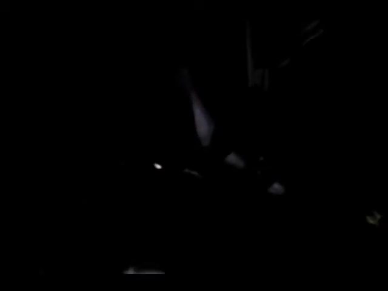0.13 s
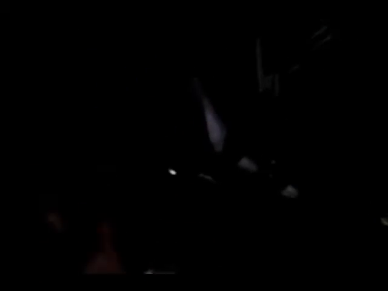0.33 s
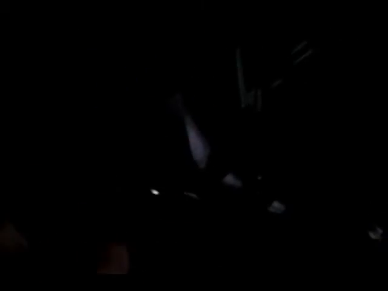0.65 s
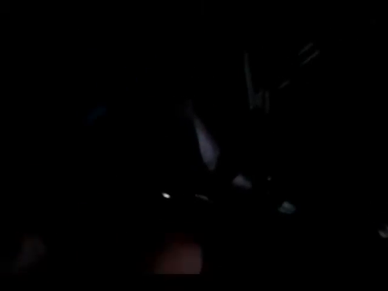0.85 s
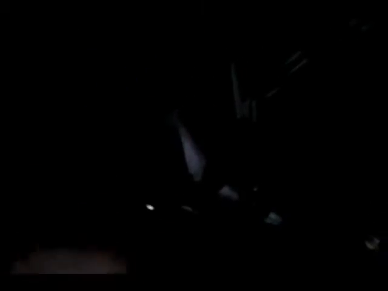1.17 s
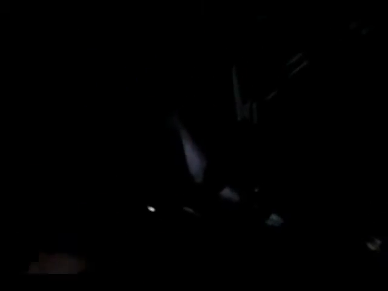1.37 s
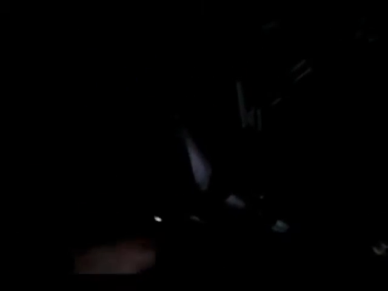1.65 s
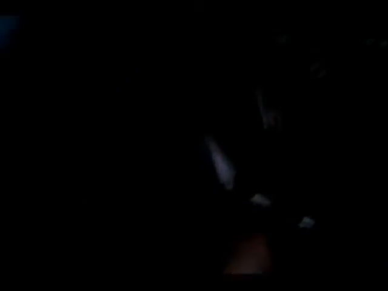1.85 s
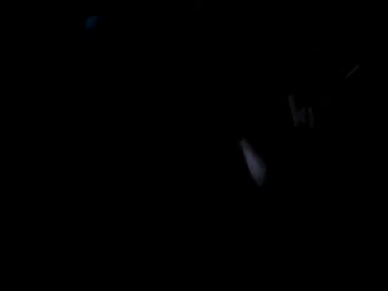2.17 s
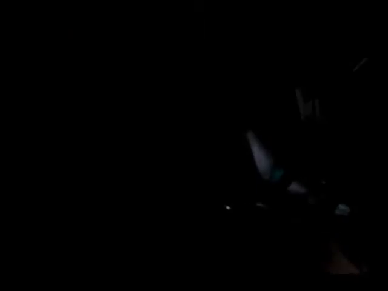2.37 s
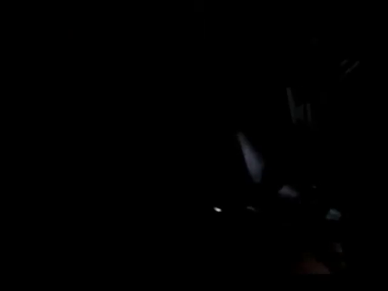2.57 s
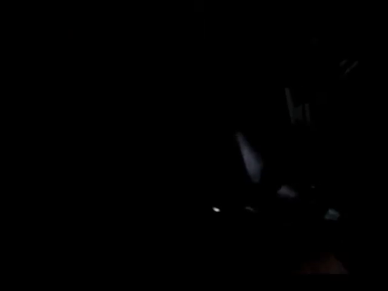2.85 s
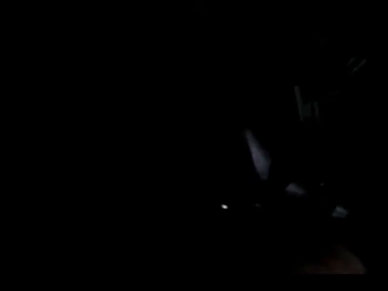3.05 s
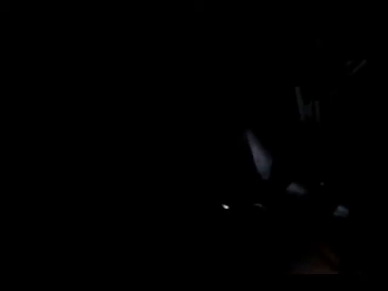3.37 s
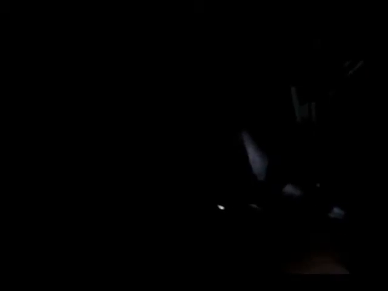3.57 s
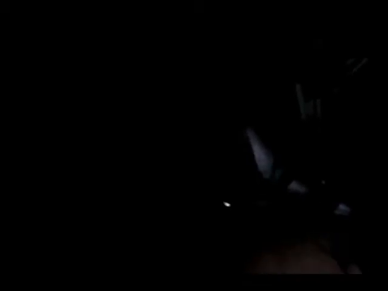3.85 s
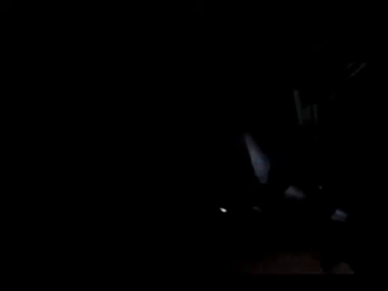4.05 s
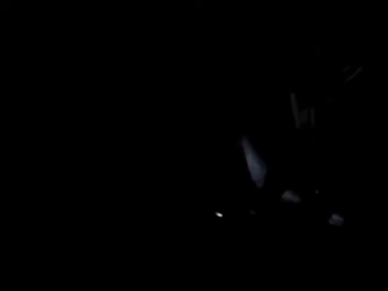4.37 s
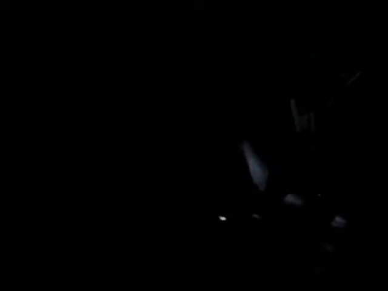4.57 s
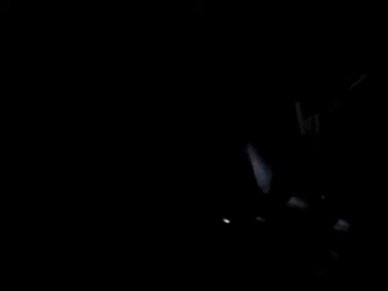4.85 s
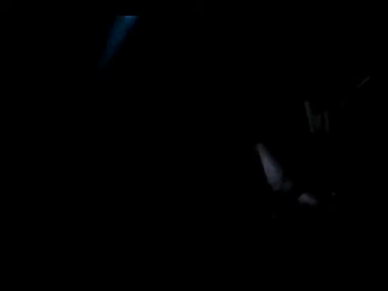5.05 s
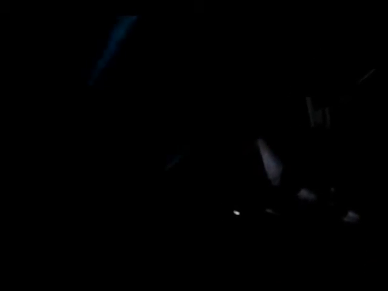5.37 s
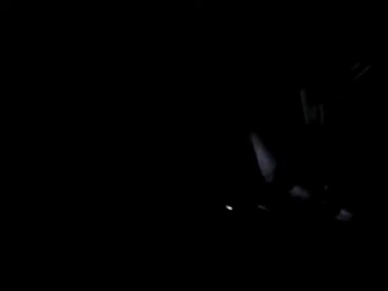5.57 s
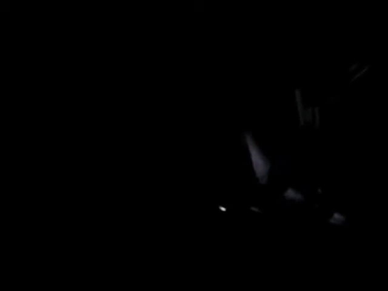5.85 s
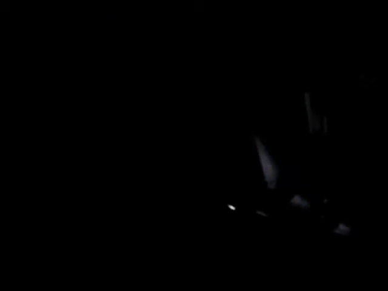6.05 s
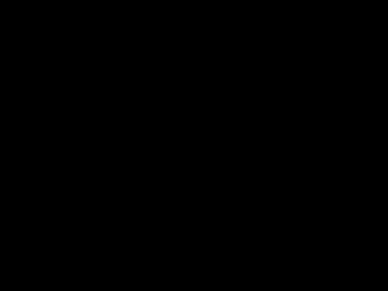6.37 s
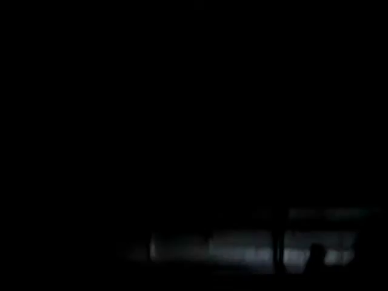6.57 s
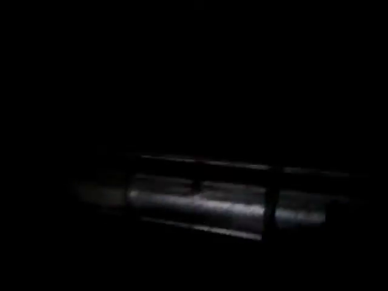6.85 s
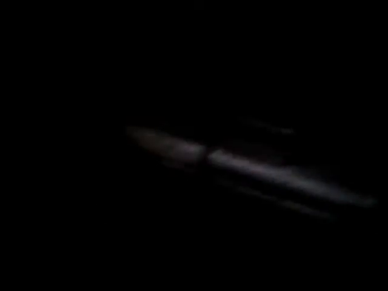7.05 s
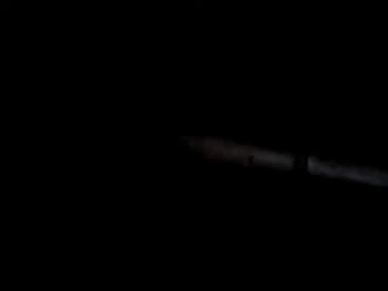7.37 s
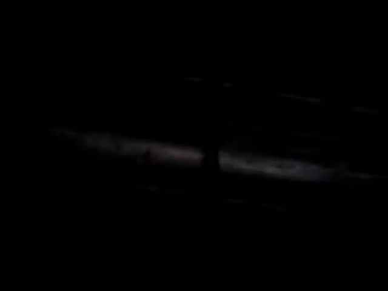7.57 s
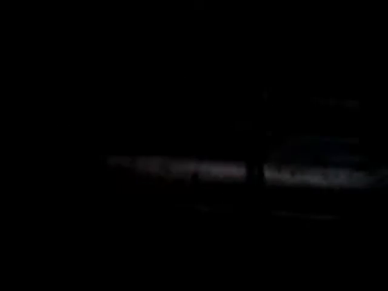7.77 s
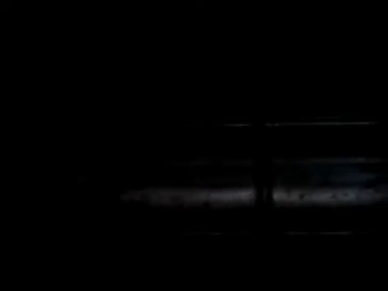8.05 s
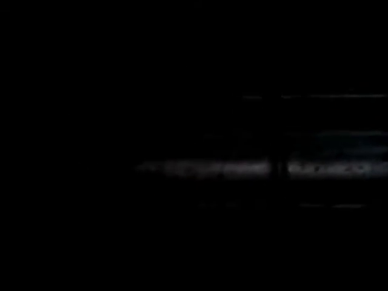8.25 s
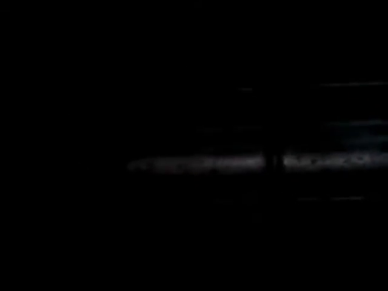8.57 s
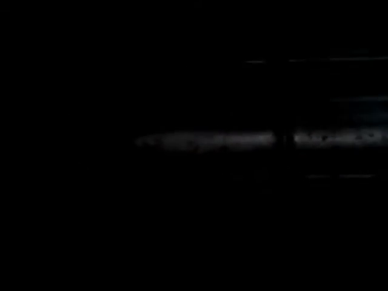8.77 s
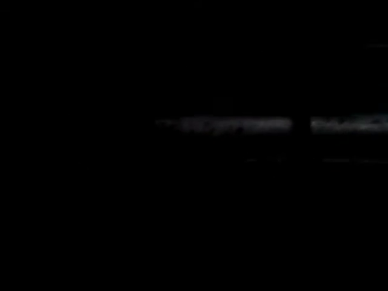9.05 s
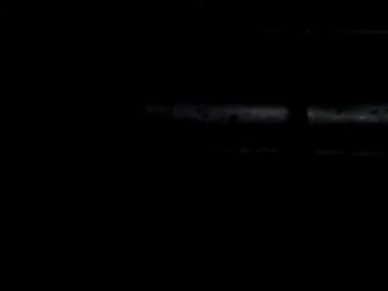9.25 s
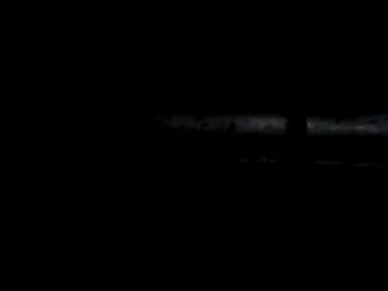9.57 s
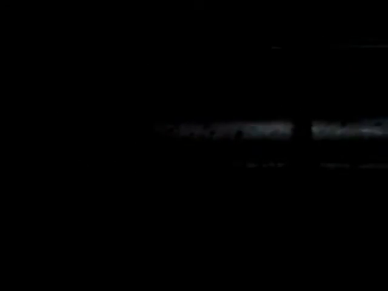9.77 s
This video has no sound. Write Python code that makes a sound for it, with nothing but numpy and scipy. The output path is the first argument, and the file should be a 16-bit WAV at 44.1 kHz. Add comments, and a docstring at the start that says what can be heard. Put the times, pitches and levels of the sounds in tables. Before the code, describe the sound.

Very close, a thin stamped metal shield is wiggled by hand beneath a vehicle. From 0 to 2 s, short bright clanks and clicks come unevenly, with a very hard blow and a dull microphone thud just after 1 s. Between 2 and 3.6 s there are lighter ticks, soft fingertip knocks and sleeve rustle. Clanks thicken at 3.7 s, and at 4.2 s a loud clattering burst snaps, scrapes and squeaks, followed by another scraping snap at 4.65 s. After that the sheet hangs slacker; only faint clicks, brisk rubs and a weak rasp near 6.3 s, with a thud at 6.55 s. A car passes some way off, tyres roaring loudest around 5.7 s, then hissing away over low traffic drone. Soft taps at 8.55 s precede duller clanks and buckling pops at 9.0 to 9.35 s, ending in light rustle and taps. Small narrow-band microphone, short hollow tail.

```python
"""Loose metal shield under a vehicle

A thin stamped shield is wiggled by hand: noise chatter rings its modes in clanks, scrapes and a light rattle.
Gliding tones add snaps and squeaks, and fingertips knock dully on the sheet.
Sleeves and grip rustle as grainy noise; a car passes some way off over a low traffic drone.
Jolts thud on a small microphone close by, which rounds off peaks and keeps a narrow band."""
import sys
import numpy as np
from scipy import signal
from scipy.fft import rfft, irfft, next_fast_len
from scipy.io import wavfile
from scipy.ndimage import uniform_filter1d, map_coordinates

SR = 44100
rng = np.random.default_rng(int(sys.argv[2]) if len(sys.argv) > 2 else 0)


def generate_wav(signal):
    """Clip the signal to [-1, 1] and save it as 16-bit WAV at the path in sys.argv[1]."""
    frames = np.transpose(np.atleast_2d(signal))
    scaled = np.clip(frames, -1, 1) * 32767
    pcm = np.round(scaled).astype(np.int16)
    wavfile.write(sys.argv[1], SR, pcm)


N = 437472

# contacts of the shield, before the mix levels in clanks(); body and edge are relative to the contact:
# start_s, level_db, body_db, edge_db, ring_hz
CONTACTS = [(0.013, -6.5, -19, -0.5, 2170), (.558, -5, -29, -3, 2147), (.573, -9, -22, -3, 1190),
            (.743, -2.5, -25, -3, 2133), (0.865, -19, -11, -5.5, 1870), (.917, -18.5, -12, -5.5, 1323),
            (0.974, -31.5, -22, -1.5, 1290), (1.055, -13, -29, -1, 1260), (1.065, 7, -35, 0.5, 1174),
            (1.089, -5, -20, -2.5, 1300), (1.116, -7.5, -25, -2, 1200), (1.204, -22, -16, -4.5, 1160),
            (1.246, -9, -7, -11, 1750), (1.251, -11.5, -15, -10, 1278), (1.468, -27, -11, -2.5, 1300),
            (1.563, -17, -25, -7.5, 1353), (1.58, -5, -16.5, -2.5, 1465), (1.916, -4.5, -19, -2.5, 1710),
            (2.342, -25, -6.5, -5.5, 1750), (2.394, -17.5, -13, -4, 1720), (2.435, -21, -16, -5.5, 1310),
            (2.549, -27, -30, -6, 1410), (2.676, -25, -11, -2, 1300), (2.751, -23.5, -32, 0, 1270),
            (3.049, -17.5, -5.5, -15.5, 1100), (3.177, -10, -27, -4, 1374), (3.193, -15, -12.5, -13, 1390),
            (3.27, -24, -2, -17, 1220), (3.338, -20.5, -27, -0.5, 1410), (3.371, -21.5, -18, -3, 1740),
            (3.399, -25, -35, -4, 2100), (3.446, -30.5, -17, -4, 1110), (3.683, -1.5, -20, -2, 1190),
            (3.705, -4.5, -12, 0, 1320), (3.741, -12.5, -8.5, -5.5, 1020), (3.768, -11.5, -21, -4, 2200),
            (3.948, -24, -24, -13, 1460), (3.973, -21, -16, 2.5, 1160), (4.007, -13, -24, -1.5, 1210),
            (4.033, -10, -24, 1, 1100), (4.163, 5.5, -20, -2, 1037), (4.187, -3, -22, -12, 1110),
            (4.198, 4, -34, -7, 1184), (4.212, -3, -20, -7.5, 2240), (4.226, -9, -24, -17, 1274),
            (4.483, -23.5, -25, 0.5, 1480), (4.646, -1, -14, 5, 1220), (4.669, -12, -28, 0, 1400),
            (4.678, -4.5, -16, -18, 1210), (5.395, -20.5, -24, -5, 1010), (5.716, -17, -20, -11, 975),
            (7.139, -31.5, -23, -2, 904), (8.124, -26.5, -11, -10.5, 1180), (9.038, 0, -22, -6.5, 1742),
            (9.043, -3, -9, -24, 1093), (9.204, -24, -3.5, -12, 1007), (9.245, -25, -11, -3, 1710),
            (9.331, -2, -4.5, -15, 1023)]
# the sheet drags over its mount; the edge is relative to the middle clang:
# start_s, length_s, level_db, edge_start_db, edge_end_db
DRAGS = [(0.546, 0.033, -28, -4, 4), (1.278, 0.037, -45, -26, -28), (1.57, .022, -31, 2, -24),
         (1.905, 0.02, -40, -5, -9), (3.034, 0.022, -50, 3, -10), (3.67, 0.063, -22.5, 1.5, -14),
         (4.165, 0.088, -19, -0.5, -11), (4.456, 0.06, -39.5, -5, -2), (4.635, 0.07, -14, 6.5, -8.5),
         (6.278, 0.055, -34.5, 7, 5), (8.532, 0.11, -45, -30, -24), (9.13, 0.041, -45.5, -17, -23),
         (9.772, 0.067, -48, -13, -1)]
# the sheet snaps through to a new bend; the deeper modes are relative to the snap:
# start_s, pitch_hz, level_db, deep_db
SNAPS = [(4.176, 977, -12, -27.5), (4.19, 943, -10, -14), (4.232, 1308, -13, -26), (4.66, 980, -12, -12),
         (9.039, 1009, -18, 1), (9.293, 1006, -24, -11), (9.332, 1025, -17, -3)]
# deeper modes of a snap, added to deep_db: pitch_ratio, level_db
SNAP_DEEP_MODES = [(.26, -3), (.54, -1)]
# an edge catches and squeaks or rasps: start_s, length_s, start_hz, end_hz, width_hz, level_db
EDGE_SQUEAKS = [(3.447, 0.011, 6000, 5900, 300, -32), (4.184, .045, 2720, 2048, 354, -15.5),
                (4.32, 0.27, 5800, 5500, 160, -50.5), (4.643, 0.0365, 4100, 3404, 600, -12.5),
                (5.707, 0.0317, 3750, 3280, 1290, -26.5), (6.267, 0.094, 3130, 2585, 1500, -34.5)]
# fingertips knock softly on the sheet: start_s, peak_db
FINGER_TAPS = [(2.09, -36), (2.23, -47), (3.885, -35), (4.057, -30), (8.55, -24), (8.599, -29),
               (9.111, -32), (9.173, -28), (9.83, -26), (9.867, -36)]
# the taut sheet's strong modes, before scatter and hand damping: pitch_hz, width_hz, level_db
STRONG_MODES = [(288, 110, -16), (623, 26, -3), (1006, 40, 1), (1216, 38, 6), (1776, 130, 0.5),
                (2153, 38, -3.5), (3380, 72, -6.5), (4120, 150, -32), (4266, 90, -2.5), (5240, 200, -9),
                (5990, 380, -8.5), (6100, 160, -18), (6900, 40, -18), (7300, 250, -5.5), (7850, 100, -2)]
# the taut sheet's crowd of weaker modes, as a spectrum: pitch_hz, level_db
WEAK_MODES = [(60, -38.5), (180, -23.5), (300, -10), (480, -13), (800, -12), (1050, -10), (1350, 6),
              (1600, -6.5), (2100, -0.5), (2750, -13), (3800, -3.5), (4900, -13), (6500, -7), (8200, -12.5)]
# the sheet goes slack once it is bent loose, and all its modes sink: time_s, pitch_ratio
SLACKENING = [(4.7, 0.99), (8.0, 0.891)]

# strokes of sleeve and grip: start_s, length_s, level_db
HAND_STROKES = [(0, 0.68, -50.5), (0.21, 0.091, -39.5), (0.414, 0.057, -35.5), (0.484, 0.83, -50),
                (1.103, 0.43, -44.5), (1.781, 0.25, -42), (2.026, 0.55, -44), (2.46, 0.6, -48.5),
                (3.006, 0.49, -54), (3.283, 0.48, -48), (3.515, 1, -43), (4.204, 0.45, -50),
                (4.97, 0.35, -34), (5.02, 0.042, -37), (6.15, 0.29, -35.5), (6.276, .095, -30.5),
                (6.541, 0.047, -32.5), (6.573, 0.046, -28), (7.139, 0.005, -41), (8.23, 0.23, -50.5),
                (8.523, 0.2, -48.5), (8.892, 0.052, -37.5), (8.963, 0.043, -41.5), (9.053, .34, -48),
                (9.5, 0.05, -53), (9.616, 0.084, -47.5), (9.718, .18, -49)]
# colour of the soft rub, as relative noise density: pitch_hz, level_db (per Hz)
CLOTH_COLOUR = [(300, -18), (600, 1.5), (800, -1), (1300, -25), (1900, -4), (2700, -5.5), (3600, -4),
                (4800, -6.5), (7600, -3.5), (8500, -7.5)]
# colour of the brisk brush: pitch_hz, level_db (per Hz)
SLEEVE_COLOUR = [(400, -16), (1500, -1.5), (2400, 1.5), (4500, -3.5), (7800, -2.0)]
# jolts on the microphone's case: start_s, level_db
CASE_BUMPS = [(1.068, -25.5), (4.166, -23), (6.56, -28), (9.04, -34)]
# colour of those thuds: pitch_hz, level_db (per Hz)
THUD_COLOUR = [(20, -6), (70, 3.0), (200, -25), (600, -51), (2000, -100)]

# colours of the car's engine, tyre roar, road noise, hiss and song: pitch_hz, level_db (per Hz)
ENGINE_COLOUR = [(30, -16), (70, -5.5), (125, -6.5), (170, -8), (260, 1), (330, -3.5), (450, -16.5),
                 (800, -45.5)]
ROAR_COLOUR = [(210, -34.5), (350, -5.5), (630, -5), (850, -3), (1100, 0.5), (1500, -7), (1930, -10.5),
               (2730, -19), (3170, -17), (5050, -22), (7640, -25), (8500, -27), (11000, -58.5),
               (18700, -120)]
ROAD_COLOUR = [(210, -30), (350, -3), (509, -8.5), (647, -8.5), (879, -1.5), (1350, -3), (1690, -0.5),
               (2420, -18.5), (3870, -20.5), (7640, -38), (8500, -34), (11000, -73), (18700, -120)]
HISS_COLOUR = [(1500, -24.5), (2700, 1.5), (4800, -2.5), (7600, -9.5), (8500, -10)]
SONG_COLOUR = [(1000, -37), (1450, -6), (1680, 5), (1900, -8), (2400, -31), (3000, -25), (3800, -17.5),
               (4800, -39)]
# colour of the town's low traffic drone: pitch_hz, level_db (per Hz)
DRONE_COLOUR = [(18, -34.5), (30, 7), (33, -4.5), (64, 2), (103, 0.5), (238, -12), (390, -18), (500, -26.5),
                (650, -55.5), (1100, -120)]
# course of the drone, before its lift in traffic(): time_s, level_db
DRONE_COURSE = [(0.15, -50.5), (1.12, -52), (2.16, -46.5), (4.42, -44.5), (5.12, -39.5), (6.44, -42.5),
                (8.53, -46.5), (9.8, -45.5)]
# decay of the gap under the vehicle: pitch_hz, t60_s
GAP_DECAY = [(200, 0.7), (1200, 0.2), (4000, 0.2), (8000, 0.16)]
# hollow resonances between floor pan and ground, before the loss in hollow(): pitch_hz, width_hz, gain_db
GAP_RESONANCES = [(284, 110, 3), (623, 33, 1.5), (830, 19, 1.5), (1065, 37, 7), (1230, 44, 2.5),
                  (1620, 150, -2), (2230, 570, 4.5), (3440, 180, 2), (3940, 1100, 3), (5730, 1000, 6),
                  (7500, 780, 6.5)]

# a contact chatters this long at 0 dB on a taut sheet (t60 in s);
# hard blows press tight and stop sooner, and so does a slack sheet
CONTACT_T60, TIGHTEN_PER_DB, SLACK_POWER = 0.052, 0.0156, 3.0
# light contacts on the flat of the sheet graze and build up slowly; those on its bright edge bite at once
GRAZE_PER_DB, FLAT_EDGE_DB = 0.12, -7
# boom of the panel's belly: taut pitch (Hz), pitch scatter (share), level under the contact (dB), t60 (s)
BELLY_HZ, BELLY_SCATTER, BELLY_DB, BELLY_T60 = 347, 0.13, -25.5, 0.15
# a stroke gathers and loses speed over these shares of its length; strokes well under BRISK_S (s) are coarse
STROKE_RISE, STROKE_FALL, BRISK_S = 0.12, 0.43, 0.14
GRIP_DB = -60.5  # the resting hand
# the car's straight path past the vehicle
CAR_DISTANCE_M, CAR_SPEED_M_PER_S = 6.86, 12.54
TOP_HZ = 8350  # upper edge of the microphone's band


def clanks(level_db=-8, clang_db=-1, ring_db=-4, ring_t60=0.047, body_slow=1.48, edge_fast=0.54, attack_s=0.00076):
    """Each contact is a brief chatter that sets the held sheet ringing; which mode leads shifts as it is flexed."""
    out, t = np.zeros(N), np.arange(SR // 5) / SR
    for start, db, body_db, edge_db, ring_hz in CONTACTS:
        flatness = np.clip(edge_db / FLAT_EDGE_DB, 0, 1)
        onset = 1 - np.exp(-t / (attack_s * np.exp(-GRAZE_PER_DB * db * flatness)))

        def tone(pitch, t60):
            return punch(np.sin(2 * np.pi * pitch * t) * amp(-60 * t / t60) * onset)

        chatter = rng.standard_normal(len(t)) * onset
        tension = tension_at(start)
        contact_t60 = CONTACT_T60 * np.exp(-TIGHTEN_PER_DB * db) * tension ** SLACK_POWER

        def answer(band, t60):
            return punch(bands(sheet(chatter * amp(-60 * t / t60), tension))[band])

        # the body lingers, the edge dies first
        low = answer(0, contact_t60 * body_slow)
        mid = answer(1, contact_t60)
        high = answer(2, contact_t60 * edge_fast)
        # what the body and the edge do not take goes into the middle clang
        share = np.sqrt(np.clip(1 - amp(2 * body_db) - amp(2 * edge_db), .12, 1))
        clang = share * punch(mid + amp(ring_db) * tone(ring_hz, ring_t60))
        belly_hz = BELLY_HZ * tension * np.exp(BELLY_SCATTER * rng.standard_normal())
        belly = amp(BELLY_DB) * tone(belly_hz, BELLY_T60)
        blow = belly + amp(body_db) * low + amp(clang_db) * clang + amp(edge_db) * high
        add(out, start, amp(db + level_db) * blow)
    return out


def scrapes(slip_rate=330, slip_t60=0.016, body_db=-1, tail_s=0.024, slip_db=4):
    """Dragged metal sticks and slips in a fast, uneven burst of tiny blows."""
    out = np.zeros(N)
    for start, length, db, edge_from, edge_to in DRAGS:
        t = np.arange(int((length + tail_s) * SR)) / SR
        slips = np.cumsum(rng.uniform(.4, 1.6, size=80)) / slip_rate
        age = t - slips[:, None]
        sizes = amp(slip_db * rng.standard_normal((len(slips), 1)))
        grip = np.sum(sizes * (age > 0) * amp(-60 * abs(age) / slip_t60), axis=0)
        progress = np.minimum(t / length, 1)
        stroke = np.sqrt(abs(np.sin(np.pi * progress)))
        force = grip * stroke * rng.standard_normal(len(t))
        low, mid, high = bands(sheet(force, tension_at(start)))
        edge = amp(edge_from + (edge_to - edge_from) * progress)
        drag = amp(body_db) * low + mid + edge * high
        # the level holds for the drag's own length, whatever the tail
        add(out, start, amp(db) * unit(drag) * np.sqrt(len(t) / (length * SR)))
    return out


def buckles(level_db=1, t60=0.084, attack_s=0.00022, sag=0.051, settle_s=0.016):
    """A snap rings the broad modes of the panel, slightly sharp until the tension lets go."""
    out, t = np.zeros(N), np.arange(SR // 4) / SR
    for start, hz, db, deep_db in SNAPS:
        phase = 2 * np.pi * np.cumsum(hz * (1 + sag * np.exp(-t / settle_s))) / SR
        ring = np.sin(phase)
        for ratio, mode_db in SNAP_DEEP_MODES:
            ring = ring + amp(deep_db + mode_db) * np.sin(ratio * phase)
        onset = 1 - np.exp(-t / attack_s)
        add(out, start, amp(db + level_db - 60 * t / t60) * onset * ring)
    return out


def squeaks():
    """Friction drives one high mode unsteadily; its pitch sinks as the edge slides."""
    out = np.zeros(N)
    for start, length, hz_from, hz_to, width, db in EDGE_SQUEAKS:
        n = int(length * SR)
        unsteady = unit(filtered(rng.standard_normal(n), lambda f: 1 / (1 + (2 * f / width) ** 2)))
        tone = np.sqrt(2) * np.sin(2 * np.pi * np.cumsum(np.linspace(hz_from, hz_to, n)) / SR)
        add(out, start, amp(db) * np.sqrt(np.hanning(n)) * unsteady * tone)
    return out


def taps(soft_hz=500, contact_t60=0.015):
    """A soft fingertip damps the sheet as it touches, so only a short, dull tock is left."""
    out, t = np.zeros(N), np.arange(SR // 10) / SR
    for start, db in FINGER_TAPS:
        burst = rng.standard_normal(len(t)) * amp(-60 * t / contact_t60)
        tock = sheet(softened(burst, soft_hz), tension_at(start))
        add(out, start, amp(db) * tock / np.max(abs(tock)))
    return out


def rattle(rate=60, level_db=-7, spread_db=4, soft_hz=1500, chatter_s=0.0046):
    """While the hand moves, the loose sheet keeps brushing its mounts in tiny, soft touches."""
    sizes = amp(spread_db * np.clip(rng.standard_normal(N), -2, 2))
    hits = (rng.random(N) < rate / SR) * sizes  # rate touches a second on average
    touches = signal.lfilter([1], [1, -np.exp(-1 / (chatter_s * SR))], hits)
    force = softened(touches * rng.standard_normal(N), soft_hz)
    soft, _ = rubbing()
    return amp(level_db) * soft * unit(sheet(force))


def sheet(force, tension=1, scatter_db=4.0, hand_loss=0.007, slack_loss=0.37):
    """The sheet's answer to a force: a broad crowd of modes, and strong ones that vary with the point of contact."""
    changes_db = scatter_db * rng.standard_normal(len(STRONG_MODES))
    # the hand damps every mode, the more so when the sheet hangs slack
    loss = hand_loss + slack_loss * max(1 - tension, 0)

    def gain(f):
        power = amp(2 * along(WEAK_MODES, f))
        for (hz, width, db), change in zip(STRONG_MODES, changes_db):
            power = power + abs(amp(db + change) * resonance(f, hz, width + loss * hz)) ** 2
        return np.sqrt(power)

    return filtered(force, lambda f: causal(gain(f / tension)))


def tension_at(s, flex=0.013):
    """Pitch ratio of the sheet's modes; the hand flexes it a little for every contact."""
    return np.interp(s, *np.transpose(SLACKENING)) * (1 + flex * rng.standard_normal())


def bands(x):
    """Split into the sheet's low body, its middle clang and its bright edge."""
    cuts = [(700, 'low'), ([800, 2600], 'band'), (2900, 'high')]
    return [signal.sosfilt(signal.butter(3, hz, kind, fs=SR, output='sos'), x) for hz, kind in cuts]


def underbody(x):
    """The gap between floor pan and ground gives a short, faint tail of decaying noise."""
    hz, t, z = signal.stft(rng.standard_normal(SR // 2), SR, nperseg=256)
    decay = amp(-60 * t / along(GAP_DECAY, hz)[:, None])
    tail = signal.istft(z * decay, SR, nperseg=256)[1]
    delay = np.zeros(SR // 200)  # 5 ms
    return signal.fftconvolve(x, np.r_[delay, tail / np.linalg.norm(tail)])[:N]


def rustle(level_db=-1.0, brush_db=-1, grain_db=1.5, flutter_db=3.5, crinkle_db=3.0):
    """Cloth and fingers rub in fine, clumped grains; brisker brushes are coarser."""
    rub, brush = rubbing()
    grains = unit(amp(grain_db * wobble(500) + flutter_db * wobble(35)))
    crinkle = unit(amp(crinkle_db * wobble(200)))
    cloth = amp(level_db) * rub * noise(CLOTH_COLOUR)
    sleeve = amp(brush_db) * brush * crinkle * noise(SLEEVE_COLOUR)
    return grains * (cloth + sleeve)


def rubbing():
    """How hard the hand rubs: the gain of its slow, soft strokes and of its brisk, coarse ones."""
    t = np.arange(N) / SR
    soft, coarse = np.full(N, amp(GRIP_DB)), np.zeros(N)
    for start, length, db in HAND_STROKES:
        progress = t[:int(length * SR)] / length
        speed = np.clip(np.minimum(progress / STROKE_RISE, (1 - progress) / STROKE_FALL), 0, 1)
        brisk = 1 / (1 + (length / BRISK_S) ** 4)
        add(soft, start, amp(db) * np.sqrt(1 - brisk) * speed)
        add(coarse, start, amp(db) * np.sqrt(brisk) * speed)
    return soft, coarse


def bumps(t60=0.13, attack_s=0.0035):
    """Jolts reach the microphone's case as dull thuds of low noise."""
    push, t = np.zeros(N), np.arange(SR // 3) / SR
    for start, db in CASE_BUMPS:
        add(push, start, amp(db - 60 * t / t60) * (1 - np.exp(-t / attack_s)))
    return push * noise(THUD_COLOUR)


def traffic(tyre_waver_db=.5, engine_waver_db=0.33, drone_db=4.0):
    """Over the town's drone one car passes: its engine leads, the tyres roar abreast, then hiss and sing as it leaves."""
    course_s, course_db = np.transpose(DRONE_COURSE)
    drone_level = np.interp(np.arange(N) / SR, course_s, course_db) + drone_db
    drone = amp(drone_level) * noise(DRONE_COLOUR, patchy_db=1.5)
    engine = passing(loudest_s=5.46, peak_db=-35.5, falloff=1.61) * noise(ENGINE_COLOUR, patchy_db=1.5)
    roar = passing(loudest_s=5.69, peak_db=-29.5, falloff=1.72) * noise(ROAR_COLOUR, patchy_db=1.5)
    road = passing(loudest_s=6.68, peak_db=-40.0, falloff=0.56) * noise(ROAD_COLOUR)
    hiss = passing(loudest_s=6.7, peak_db=-49, falloff=3.7) * noise(HISS_COLOUR)
    song = passing(loudest_s=6.96, peak_db=-41.0, falloff=14) * noise(SONG_COLOUR)
    tyres = amp(tyre_waver_db * wobble(8)) * (roar + road + hiss + song)
    return tyres + amp(engine_waver_db * wobble(8)) * (engine + drone)


def passing(loudest_s, peak_db, falloff):
    """Gain of one part of the car's sound: it sinks with distance, the faster the more it is beamed."""
    distance = np.hypot(CAR_DISTANCE_M, CAR_SPEED_M_PER_S * (np.arange(N) / SR - loudest_s))
    return amp(peak_db) * (CAR_DISTANCE_M / distance) ** falloff


def hollow(x, loss_db=-2):
    """Sound under the vehicle takes on the resonances of the gap."""
    def gain(f):
        lift_db = sum(db * abs(resonance(f, hz, width)) ** 2 for hz, width, db in GAP_RESONANCES)
        return amp(loss_db + lift_db)

    return filtered(x, gain)


def noise(spectrum, patchy_db=2):
    """Coloured noise of rms 1 whose colour drifts in patches."""
    z = signal.stft(rng.standard_normal(N), nperseg=1024)[2]
    field = uniform_filter1d(rng.standard_normal(z.shape), size=6, axis=0)  # smooth over pitch
    field = uniform_filter1d(field, size=12, axis=1)  # then over time
    patchy = signal.istft(z * amp(patchy_db * unit(field)), nperseg=1024)[1][:N]
    return unit(filtered(patchy, lambda hz: amp(along(spectrum, hz))))


def wobble(rate):
    """A smooth random curve, rate knots a second."""
    return map_coordinates(rng.standard_normal(int(N * rate / SR) + 4), [np.arange(N) * rate / SR])


def resonance(f, hz, width):
    """Complex response of one damped mode with a peak gain of 1."""
    return 1j * f * width / (hz * hz - f * f + 1j * f * width)


def softened(x, soft_hz):
    """A soft touch passes little force above soft_hz: a one-pole lowpass."""
    return filtered(x, lambda f: 1 / (1 + 1j * f / soft_hz))


def causal(gain):
    """The minimum-phase response with this gain: nothing sounds before the blow."""
    cepstrum = irfft(np.log(np.maximum(gain, 1e-6)))
    half = len(cepstrum) // 2
    return np.exp(rfft(np.r_[cepstrum[0], 2 * cepstrum[1:half], np.zeros(half)]))


def filtered(x, response):
    """Filter x by a response given as a function of frequency."""
    m = next_fast_len(len(x) + SR // 10)
    return irfft(rfft(x, m) * response(np.fft.rfftfreq(m, 1 / SR)), m)[:len(x)]


def along(points, hz):
    """Read (Hz, value) points on a log frequency axis."""
    f, v = np.transpose(points)
    return np.interp(np.log(hz + 1), np.log(f + 1), v)


def amp(db):
    """Decibels to gain."""
    return 10 ** (np.asarray(db) / 20)


def unit(x):
    """Scale to rms 1."""
    return x / np.sqrt(np.mean(x ** 2) + 1e-20)


def punch(x):
    """Scale a blow to the energy of 10 ms at rms 1."""
    return x / np.sqrt(np.sum(x ** 2) / (SR / 100) + 1e-20)


def add(track, s, sound):
    """Mix a sound in at time s."""
    part = track[max(round(s * SR), 0):][:len(sound)]
    part += sound[:len(part)]


def scene(wet_db=-18):
    """The shield in its cramped space, over rustle and traffic."""
    metal = clanks() + scrapes() + buckles() + squeaks() + taps() + rattle()
    shield = metal + amp(wet_db) * underbody(metal)
    background = hollow(rustle() + traffic())
    return (shield + background + bumps())[None]


def record(dry, ceiling=0.43):
    """The microphone rounds off peaks, keeps only a narrow band and rests a little off zero."""
    rounded = dry[0] / (1 + (dry[0] / ceiling) ** 4) ** .25
    narrow = filtered(rounded, lambda hz: 1 / np.sqrt(1 + (hz / TOP_HZ) ** 110))
    return narrow[None] - .133


dry = scene()
out = record(dry)
generate_wav(out)
```